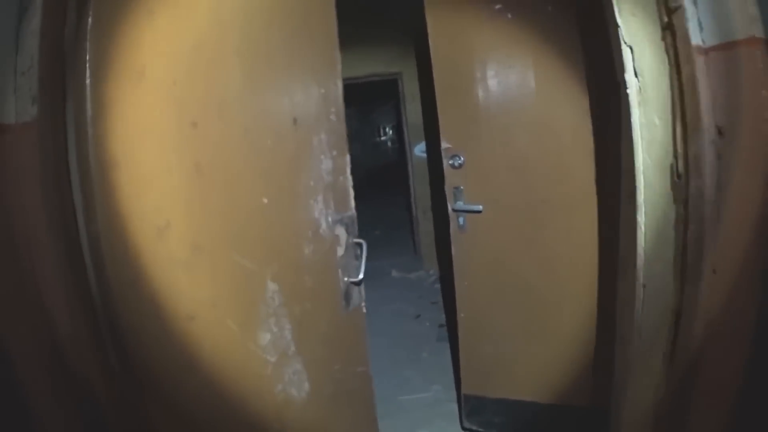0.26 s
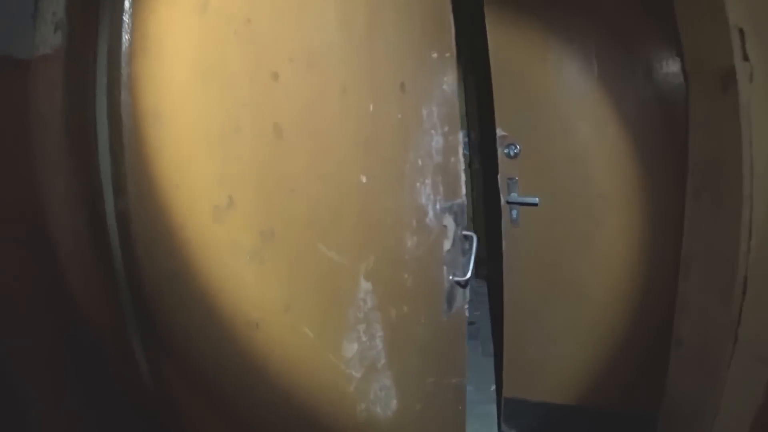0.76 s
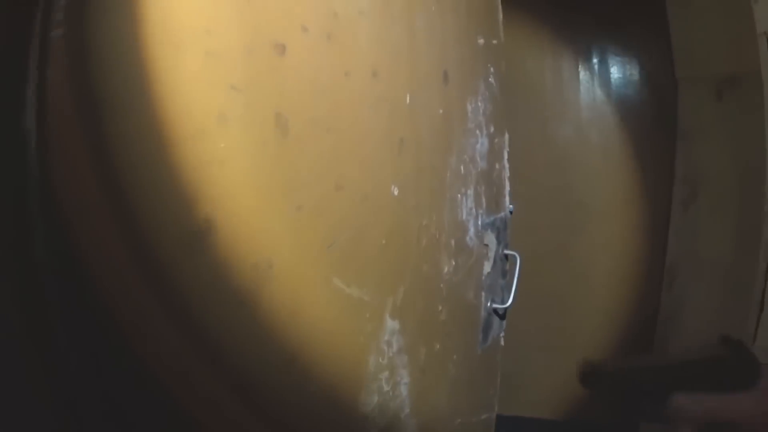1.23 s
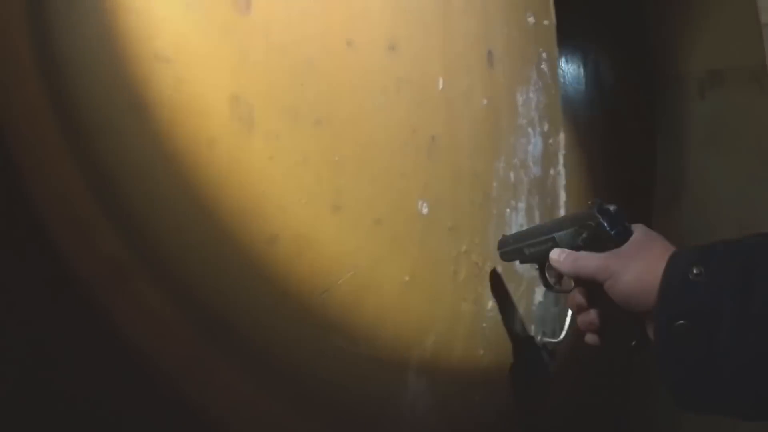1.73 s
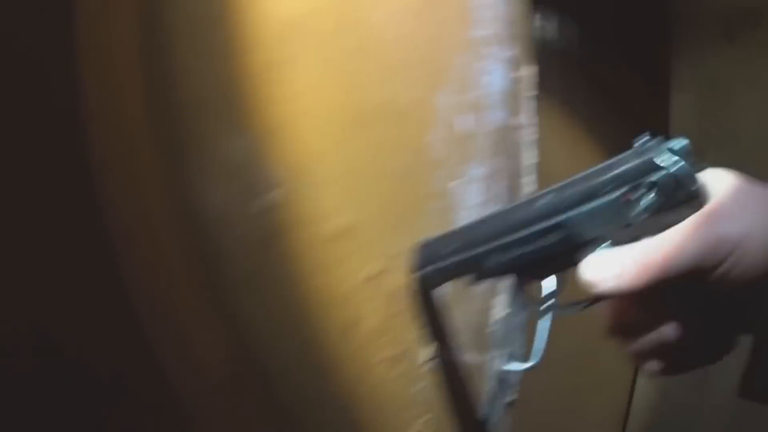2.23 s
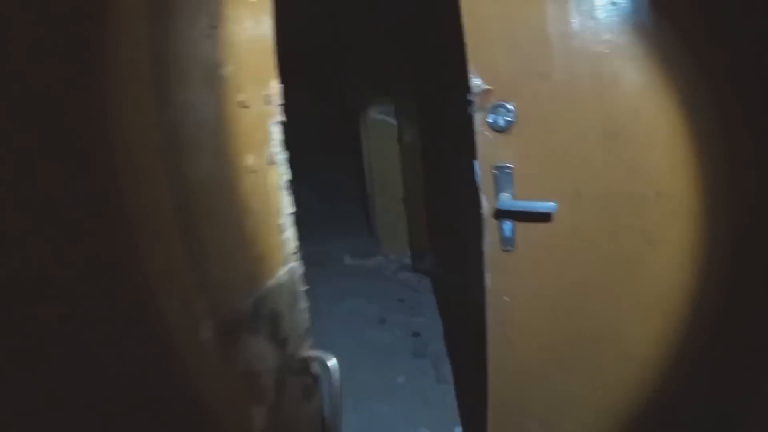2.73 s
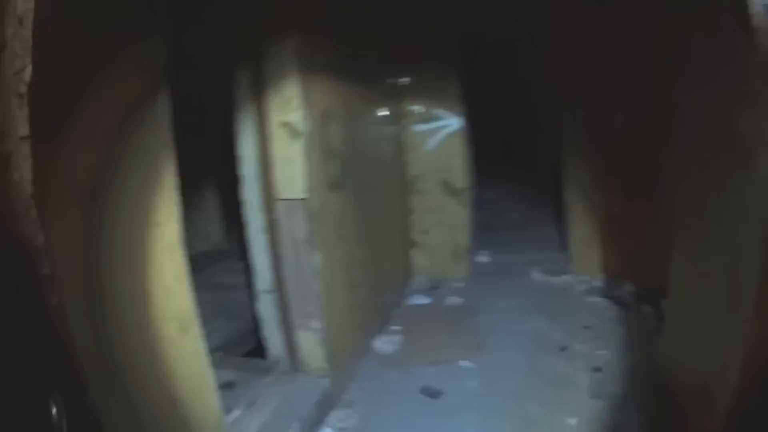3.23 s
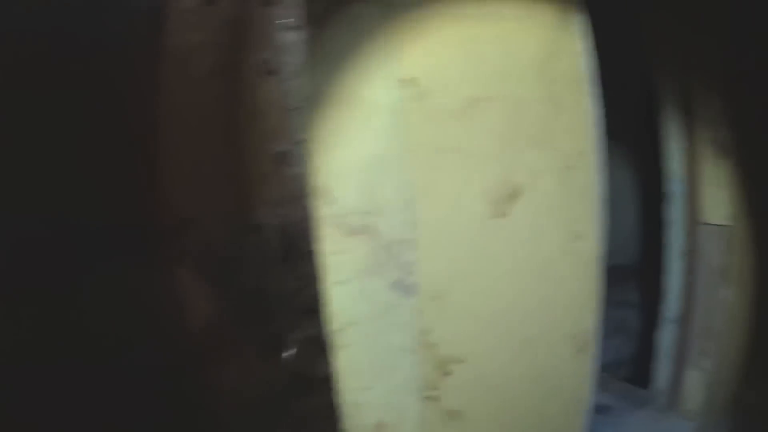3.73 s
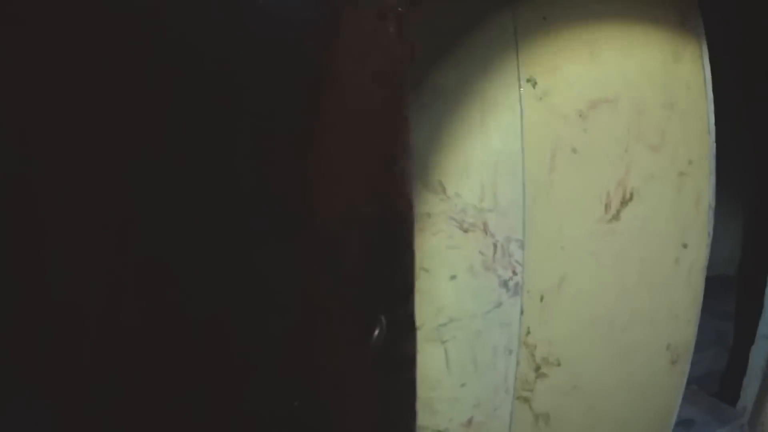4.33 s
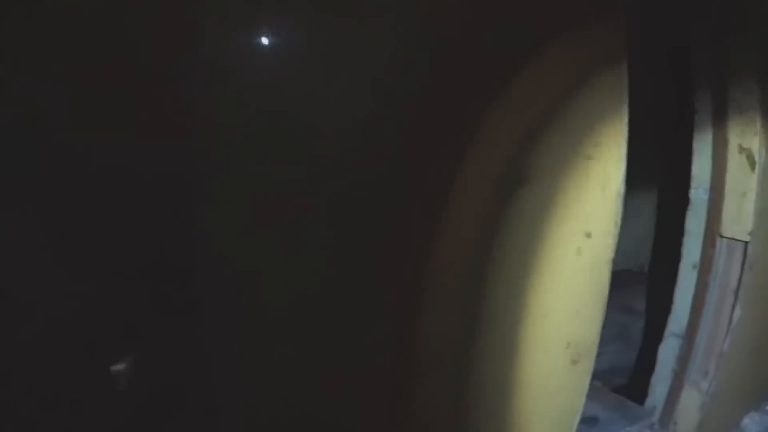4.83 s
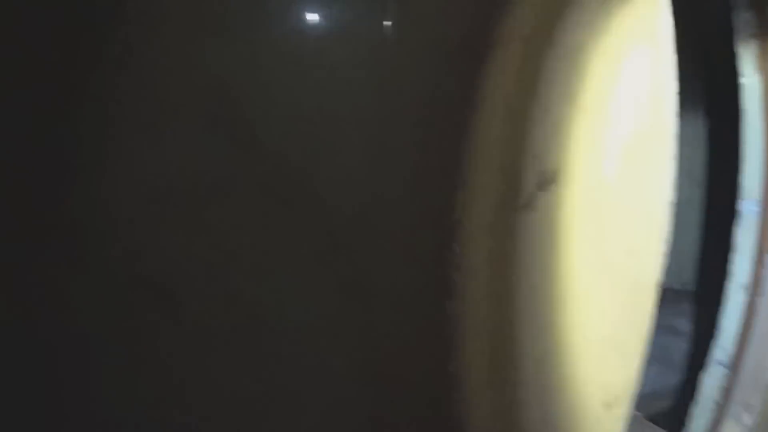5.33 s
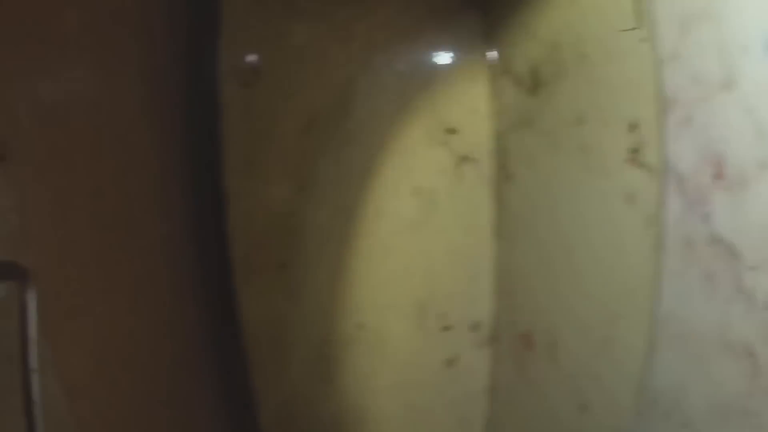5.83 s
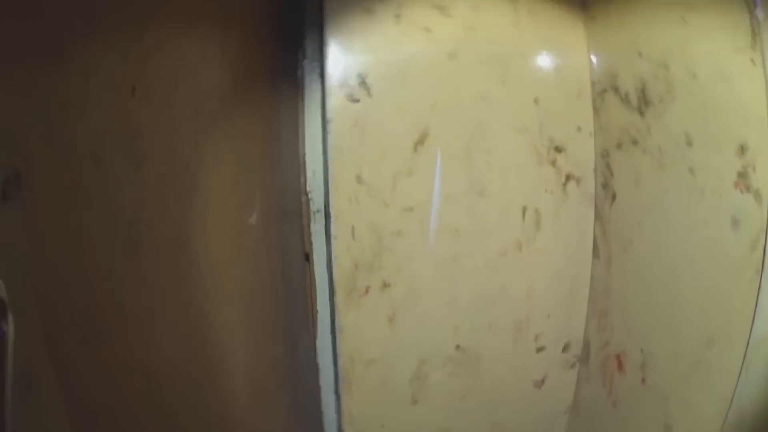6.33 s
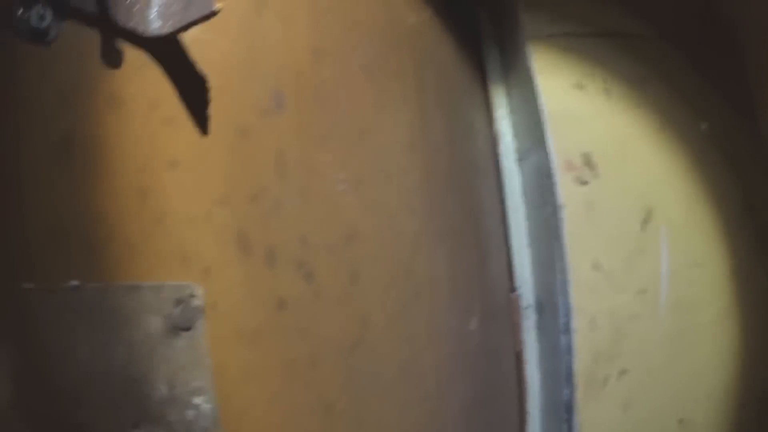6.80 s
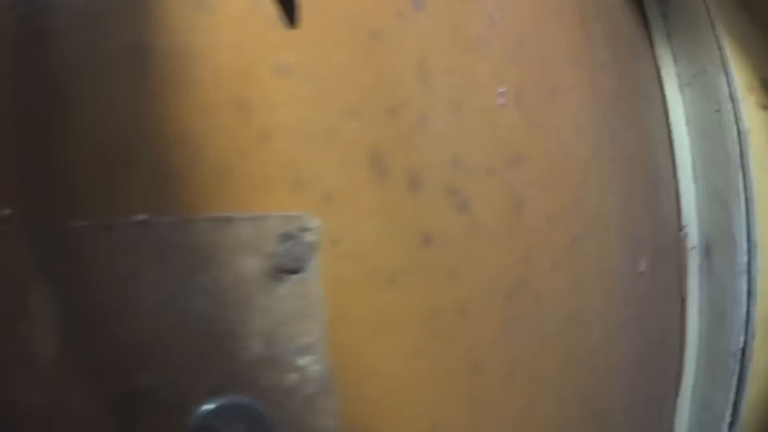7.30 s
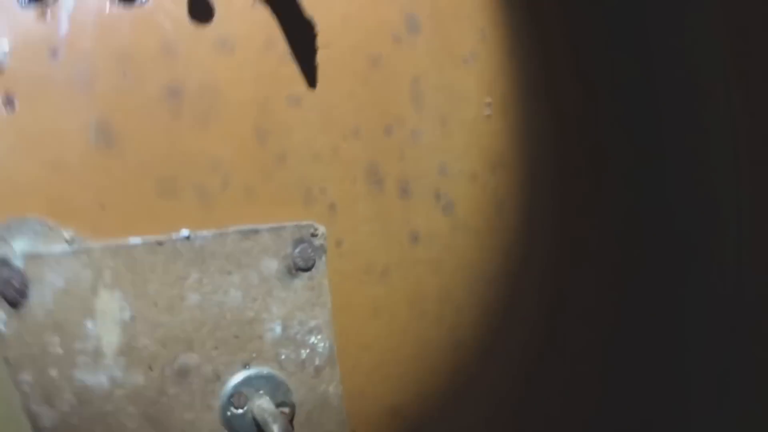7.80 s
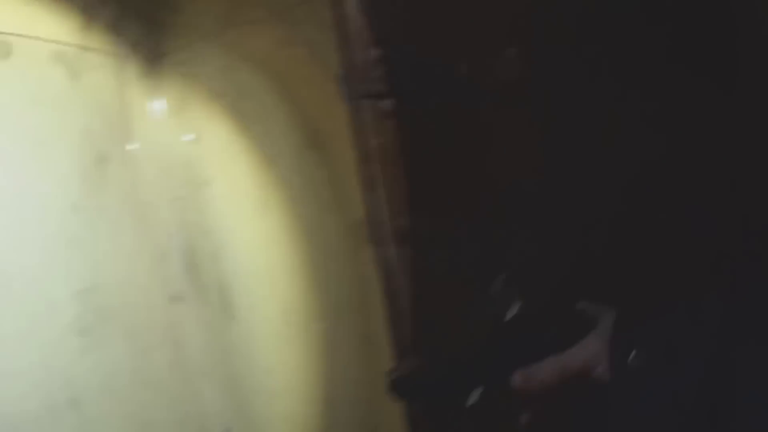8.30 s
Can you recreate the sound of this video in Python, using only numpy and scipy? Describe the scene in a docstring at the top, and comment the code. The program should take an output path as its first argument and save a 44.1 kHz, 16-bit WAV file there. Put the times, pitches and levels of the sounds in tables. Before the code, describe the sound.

Heavy metal-clad doors are knocked, slammed once with a huge ringing boom, then rattled and squeaked in a bare echoing corridor over steady hiss.

```python
"""Soft shuffling and a first light knock come out of steady hiss; then someone works heavy sheet-clad doors
in a bare corridor: one slam, many knocks, latch clatter and a squeaking handle. Ringing modes and rattling
noise make the blows, uneven sine tones the squeaks, damped low swings the thumps, filtered noise the shoes
on grit and the rubbed cloth. Hard walls add echoes, and the input clips the loudest peaks."""
import sys
import numpy as np
from scipy import signal
from scipy.fft import rfft, irfft
from scipy.io import wavfile
from scipy.ndimage import uniform_filter1d

SR = 44100
rng = np.random.default_rng(int(sys.argv[2]) if len(sys.argv) > 2 else 0)


def unload_wav(signal):
    """Save mono or channel-first audio to the path in sys.argv[1] as 16-bit WAV at rate SR, clipped to [-1, 1]."""
    wavfile.write(
        sys.argv[1],
        SR,
        np.round(np.clip(np.atleast_2d(signal).T, -1, 1) * 32767).astype(np.int16),
    )


def undo_db(level):
    """Turn decibels back into plain size, where 20 dB means ten times bigger."""
    steps = np.asarray(level, float) / 20
    return 10 ** steps


N = 377329

# ways the door leaf can ring: pitch_hz, level_db, ring_share (1 = the whole ring time of the blow)
DOOR_MODES = [(146, -4, 1.2), (177, -3, 1.2), (203, 0, 1.1), (232, -4, 1.1), (265, 0, 1.1), (308, 3, 1.1),
              (345, 1, 1.1), (415, -8, .8), (464, 0, .9), (497, -1, .8), (530, -3, .8), (582, 1, .7),
              (643, 0, .7), (735, -3, .7), (781, -4, .7), (860, -5, .7), (961, -1, .6), (1070, 0, .6),
              (1195, 1, .6), (1320, 0, .5), (1430, -2, .45), (1550, -4, .4), (1680, -6, .35),
              (1850, -8, .3)]


def band(x, lo_hz, hi_hz, order=2):
    """Keep only the sound between two frequencies, without looking ahead in time."""
    return signal.sosfilt(signal.butter(order, [lo_hz, hi_hz], "bandpass", fs=SR, output="sos"), x)


def unit(x):
    """Scale to an rms of 1."""
    return x / np.sqrt(np.mean(x ** 2))


def walk(rate_hz):
    """Random values, each held for 1 / rate_hz seconds, then smoothed twice into a wandering curve."""
    k = int(SR / rate_hz)
    steps = np.repeat(rng.standard_normal(N // k + 1), k)
    return 1.49 * uniform_filter1d(uniform_filter1d(steps, k), k)[:N]


def wide(side_db):
    """Stereo noise; side_db sets its left-right difference against its common part."""
    mid, side = rng.standard_normal((2, N))
    return mid + undo_db(side_db) * side * np.array([[1], [-1]])


def hiss():
    """Still air and preamplifier noise: random noise shaped by frequency, widest in the middle of the range."""
    # tone colour of the hiss: pitch_hz, relative_level_db
    colour = [(15, -42.5), (25, 11.5), (54, 3.5), (110, 2.5), (350, 7), (600, -3.5), (1400, -0.5),
              (3080, -4.5), (6000, -6), (11000, -16), (14000, -20.5)]
    # stereo width of the hiss: pitch_hz, side_over_mid_db
    width = [(60, -18.5), (110, 1), (190, 2.5), (350, 3), (620, 14.5), (1110, 7.5), (2000, 3), (3580, -0.5),
             (6420, -6.5), (11500, -3.5)]
    level_db = -55.5  # rms of the common part
    log_hz = np.log(np.maximum(np.fft.rfftfreq(N, 1 / SR), 1))
    colour_hz, colour_db = np.transpose(colour)
    width_hz, width_db = np.transpose(width)
    mid_db = np.interp(log_hz, np.log(colour_hz), colour_db)
    side_db = np.interp(log_hz, np.log(width_hz), width_db)
    mid, side = rfft(rng.standard_normal((2, N))) * undo_db(mid_db)
    mid, side = irfft(mid, N), irfft(side * undo_db(side_db), N)
    return undo_db(level_db) * (mid + side * np.array([[1], [-1]])) / mid.std()


def rustle():
    """Jacket cloth rubbing close by: short narrow bands of flickering noise."""
    # cloth brushes: start_s, length_s, centre_hz, level_db (before each swells and fades)
    brushes = [(5.08, 0.024, 5840, -51.5), (5.316, 0.11, 4890, -54.5), (6.493, 0.048, 5480, -53),
               (6.673, 0.27, 5370, -54), (6.911, 0.041, 5460, -47.5), (6.994, 0.2, 4570, -53),
               (7.973, 0.084, 5700, -46.5), (8.287, 0.16, 5350, -53.5), (8.449, 0.033, 5730, -40)]
    out = np.zeros((2, N))
    noise = wide(-8.0) * undo_db(1.1 * walk(450))
    for start_s, length_s, centre_hz, level_db in brushes:
        i, n = int(start_s * SR), int(length_s * SR)
        brush = unit(band(noise[:, i:i + n], centre_hz / 1.23, centre_hz * 1.2))
        out[:, i:i + n] += undo_db(level_db) * brush * np.sqrt(np.hanning(n))
    return out


def scuffs():
    """A dull tread through the floor and gritty grains under the soles; each scuff swells, holds and dies away."""
    # feet and clothes: start_s, length_s (until it dies away), tread_db, grit_db (before the flutter)
    scuff_events = [(0.577, 0.087, -50.5, -50.5), (0.78, 0.19, -55.5, -55), (1.427, 0.1, -41.5, -61.5),
                    (1.799, 0.2, -56, -47), (2.01, 0.15, -42, -45), (2.513, 0.065, -51, -47.5),
                    (2.968, 0.15, -42, -48.5), (3.652, 0.14, -49, -53), (4.678, 0.14, -55.5, -60),
                    (5.413, 0.31, -46, -43.5), (5.881, 0.062, -50.5, -56), (6.664, 0.13, -49.5, -53),
                    (7.52, 0.063, -49, -50.5), (7.553, 0.018, -41, -47), (7.695, 0.16, -42.5, -45),
                    (7.97, 0.2, -51, -48), (8.18, 0.17, -45, -56.5)]
    # shuffling between the scuffs: time_s, tread_db, grit_db (before the flutter)
    shuffle = [(0, -56.5, -55.5), (.5, -56.5, -62), (1.15, -54, -59), (2.4, -53.5, -54),
               (3.4, -52.5, -58.5), (4.202, -62.5, -78.5), (4.5, -54.5, -66.5), (5.2, -57, -115),
               (6.3, -58.5, -64.5), (7.2, -54, -60), (8.56, -50.5, -52.5)]
    attack_s, release_s = 0.03, 0.12
    t = np.arange(N) / SR
    time_s, tread_db, grit_db = np.transpose(shuffle)
    tread = undo_db(np.interp(t, time_s, tread_db))
    grit = undo_db(np.interp(t, time_s, grit_db))
    for start_s, length_s, tread_db, grit_db in scuff_events:
        swell = np.clip((t - start_s) / attack_s, 0, 1)
        shape = swell * np.exp(-np.maximum(t - start_s - length_s, 0) / release_s)
        tread = np.hypot(tread, undo_db(tread_db) * shape)
        grit = np.hypot(grit, undo_db(grit_db) * shape)
    # both levels flutter at random
    tread = tread * undo_db(2.5 * walk(40))
    grit = grit * undo_db(1.5 * walk(50))
    # about one sample in ten carries a grain
    grains = undo_db(.8 * rng.exponential(size=N)) * (rng.random(N) < .1)
    dull = unit(band(wide(-8.5), 88, 1010)) + undo_db(-13) * unit(band(wide(-15.5), 22, 130))
    gritty = unit(band(wide(-9.5) * grains, 1000, 3020, order=1))
    return tread * dull + grit * gritty


def thumps():
    """Heels and door edges land softly: a low swing with a neighbour above and below, quickly damped."""
    # thumps through the floor: start_s, level_db (of the main swing, before damping), pitch_hz,
    # fade_s (time to fall 60 dB)
    thump_events = [(0.594, -43.5, 136.5, 0.25), (0.719, -53, 150, 0.1), (1.369, -39.5, 132, 0.19),
                    (1.638, -49, 96.9, 0.1), (2.975, -26, 198, 0.084), (3.131, -29.5, 111, 0.072),
                    (3.32, -26, 144, 0.11), (3.869, -41, 52, 0.11), (4.028, -49, 51.3, 0.13),
                    (4.354, -43, 137.5, 0.15), (5.071, -48, 74.3, 0.095), (5.414, -31.5, 103.3, 0.1),
                    (6.049, -47, 94.6, 0.1), (6.34, -43.5, 146.3, 0.071), (6.573, -37, 124, 0.1),
                    (6.711, -36, 102, 0.1), (6.749, -45, 61.9, 0.1), (6.828, -40, 86.1, 0.1),
                    (6.908, -43, 81, 0.13), (7.398, -33.5, 186, 0.11), (8.109, -25, 198.6, 0.14)]
    attack_s = 0.0018
    out = np.zeros(N + SR)
    t = np.arange(SR // 2) / SR
    phases = rng.uniform(0, 2 * np.pi, (len(thump_events), 2))
    for (start_s, level_db, pitch_hz, fade_s), phase in zip(thump_events, phases):
        turn = 2 * np.pi * pitch_hz * t
        swing = np.sin(turn) + 0.68 * np.sin(2.7 * turn + phase[0]) + 0.79 * np.sin(.6 * turn + phase[1])
        shape = (1 - np.exp(-t / attack_s)) * np.exp(-np.log(1000) * t / fade_s)
        out[int(start_s * SR):][:len(t)] += undo_db(level_db) * swing * shape
    return out[:N]


def squeak():
    """Surfaces stick and slip: tones that are thin when the slips are even and rough when they are not."""
    # long squeak of the handle: time_s, slip_hz, level_db (before the stutter), roughness (0-1)
    handle = [(7.67, 1019, -31.5, .05), (7.746, 1089, -40, 0.05), (7.785, 1235, -26, 0.08),
              (7.809, 1256, -35.5, .07), (7.824, 1091, -38, 0.12), (7.851, 1153, -35.5, 0.14),
              (7.885, 1240, -32.5, 0.1), (7.919, 1360, -40, 0.04), (7.94, 1420, -52, 0.2)]
    # short creaks of hinge and handle: start_s, length_s, first_slip_hz, last_slip_hz, level_db (peak, before
    # the stutter)
    creaks = [(4.569, 0.089, 326, 225, -51), (4.729, 0.056, 1126, 1144, -45.5),
              (4.771, 0.15, 272, 224, -52), (8.306, 0.063, 800, 794, -35)]
    creak_rough = 0.088  # 0-1
    t, out = np.arange(N) / SR, np.zeros(N)
    uneven = walk(1200)
    stutter_db = 3.5 * walk(250)

    def slip(on, slip_hz, level_db, rough):
        """Slips at an uneven rate, heard as a tone with a faint octave."""
        phase = np.cumsum(2 * np.pi * slip_hz * (1 + rough * uneven[on])) / SR
        return undo_db(level_db + stutter_db[on]) * (np.sin(phase) + .07 * np.sin(2 * phase))

    time_s, *columns = np.transpose(handle)
    on = slice(int(time_s[0] * SR), int(time_s[-1] * SR))
    curves = [np.interp(t[on], time_s, column) for column in columns]
    out[on] = signal.windows.tukey(len(t[on]), .2) * slip(on, *curves)
    for start_s, length_s, first_hz, last_hz, level_db in creaks:
        i, n = int(start_s * SR), int(length_s * SR)
        on = slice(i, i + n)
        out[on] += np.hanning(n) * slip(on, np.linspace(first_hz, last_hz, n), level_db, creak_rough)
    return out


def blow(body_db, panel_db, plate_db, crack_db, tick_db, ring_s, chance, noise):
    """One contact: every mode starts with its own strength; loose cladding rattles between and above the modes."""
    hz, db, share = np.transpose(DOOR_MODES)[:, :, None]
    pitch_luck, strength_luck, phase_luck, beat_luck = chance
    t = np.arange(int(min(1.0 * ring_s + .08, 1.2) * SR)) / SR
    fade = np.log(1000) * t / ring_s
    hz = hz * (1 + .01 * pitch_luck)
    # each mode is a close pair, so it beats; the place of contact sets which modes speak
    beat = np.cos(2 * np.pi * .015 * hz * beat_luck * t + .5 * phase_luck)
    # neighbouring body modes swing against each other; the higher ones start together: a sharp front
    swing = np.where(hz < 400, (-1) ** np.arange(len(DOOR_MODES))[:, None], 1)
    # modes lean towards the louder neighbouring range
    lean_db = np.interp(np.log(hz), np.log([230, 600, 1300, 2800]), [body_db, panel_db, plate_db, crack_db])
    strength = swing * undo_db(db + .6 * lean_db + 1.5 * strength_luck)
    modes = strength * np.sin(2 * np.pi * hz * t + .5 * phase_luck) * beat * np.exp(-fade / share)
    # the contact itself, before the leaf rings freely
    snap = 1 + 1.2 * np.exp(-t / .003) + 3.75 * np.exp(-t / 0.02)
    first = int(.015 * SR)  # levels are set over the first 15 ms
    out = np.zeros(len(t))
    # low edge Hz, high edge Hz, level dB, how fast the rattle dies
    ranges = ((148, 389, body_db, 0.65), (404.4, 896, panel_db, 0.82), (972, 1950, plate_db, 1.59))
    for lo, hi, band_db, quick in ranges:
        tone = modes[(hz[:, 0] >= lo) & (hz[:, 0] < hi)].sum(axis=0)
        rattle = band(noise[:len(t)] * np.exp(-quick * fade), lo, hi)
        part = tone / tone[:2 * first].std() + .85 * rattle / rattle[:2 * first].std()
        part = band(snap * part, .95 * lo, 1.05 * hi, order=3)
        out += undo_db(band_db) * part / part[:first].std()
    # metal on metal: a spiky crack, then a short buzz
    spikes = noise[-len(t):] * abs(noise[1:len(t) + 1])
    spikes = spikes * (np.exp(-t / 0.0013) + .5 * np.exp(-t / np.minimum(0.092 * ring_s, .025)))
    for lo, hi, band_db in ((1630, 4300, crack_db), (4170, 9060, tick_db)):
        part = band(spikes, lo, hi, order=3)
        out += undo_db(band_db) * part / part[:first].std()
    # the frame and floor shudder below the leaf's modes
    shudder = unit(band(noise[:len(t)], 22, 47)) * np.exp(-.45 * fade)
    shudder = shudder * np.minimum(t / 0.0086, 1) * np.hanning(2 * len(t))[len(t):]
    return out + undo_db(body_db - 28) * shudder


def door():
    """All blows, each a little to one side; thud of leaf and clack of hardware share five pitch ranges."""
    # blows: start_s, thud_db, thud_centre_octaves (above 230 Hz), clack_db, clack_centre_octaves (above 230 Hz);
    # levels are rms over the first 15 ms at the centre, before the soft start
    blows = [(0.0738, -39, 2.3, -37.5, 3.64), (0.417, -70, 4, -45, 2.8), (0.466, -45.5, 2.5, -48.5, 2.7),
             (0.605, -47.5, 0.1, -41.5, 3.6), (0.716, -67, 1, -42.5, 2.3), (0.84, -64, 6, -43, 2.8),
             (1.369, -47, -7, -53, 4.54), (1.4151, -16, 1.78, -19.5, 3.22), (1.8, -39, 0.8, -38, 3.77),
             (1.9164, -1, 1.1, -23, 3.44), (2.247, -22.5, 0.4, -55, 2), (2.312, -23, 2.55, -28.5, 3.76),
             (2.576, -42, 2.7, -43.6, 2.6), (2.976, -37.5, 1, -46, 3.2), (3.009, -54.4, 0, -44, 3.2),
             (3.12, -33.5, 1.15, -40, 3.37), (3.316, -22.5, 1.28, -32.5, 1.92),
             (3.578, -42.5, 0.9, -40, 3.16), (3.601, -26.5, 3, -37.5, 5.1), (3.74, -44.5, 1.7, -45, 2.8),
             (4.006, -42, 0.9, -54, 1.6), (4.348, -43.5, 1.8, -46.5, 2.0), (4.371, -59.5, 0.48, -47.5, 3.9),
             (4.521, -51, 2.5, -46, 3.89), (5.083, -47, 0.9, -48.5, 5), (5.4102, -26.5, 0.96, -45, 2.85),
             (5.463, -32, 1.6, -34, 4.05), (5.472, -48.5, -8, -22.5, 3.42), (5.4798, -28, 2.5, -25, 4.17),
             (5.583, -33.5, 2.29, -24.5, 3.76), (5.595, -34, 2, -33, 3.8), (5.638, -32.5, 2.64, -36.5, 4),
             (5.93, -39.5, 1.7, -41.5, 1.5), (6.578, -15, 2, -37.5, 3.87), (6.618, -37, 2.7, -60, 4.49),
             (6.716, -33.5, 1.1, -54, 3.9), (6.821, -36, 0.7, -69, 5.2), (7.0045, -19, 1.22, -30, 2.58),
             (7.394, -37, 2, -39, 4.2), (7.69, -26.5, 1.22, -34.5, 3.5), (7.714, -32.5, 1.9, -51, 3.35),
             (8.096, -14, 1.46, -14, 3.05), (8.32, -42, 2.5, -61, 3.9), (8.54, -38.5, 2.1, -37, 2.64)]
    low_hz = 230
    ranges_hz = np.array([230, 600, 1300, 2800, 5800])  # body, panel, plate, crack, tick
    # loss one octave off the centre, growing with the square of the distance
    thud_fall_below_db, thud_fall_above_db, clack_fall_db = 6.5, 16, 9.5
    slam_db = -8  # a thud above this sets the whole leaf ringing
    knock_ring_s, slam_ring_s = .16, 1
    soft_db = -37  # blows no louder than this start softly
    contact_s, soft_contact_s = .0003, .003  # rise times
    out = np.zeros((2, N + 2 * SR))
    chances = rng.standard_normal((len(blows), 4, len(DOOR_MODES), 1))
    noise = rng.standard_normal(N + 2 * SR)
    octaves = np.log2(ranges_hz / low_hz)
    for (start_s, thud_db, thud_oct, clack_db, clack_oct), chance in zip(blows, chances):
        thud_fall_db = np.where(octaves < thud_oct, thud_fall_below_db, thud_fall_above_db)
        thud = undo_db(thud_db - thud_fall_db * (octaves - thud_oct) ** 2)
        clack = undo_db(clack_db - clack_fall_db * (octaves - clack_oct) ** 2)
        levels_db = 20 * np.log10(np.hypot(thud, clack))
        ring_s = slam_ring_s if thud_db > slam_db else knock_ring_s
        i = int(start_s * SR)
        y = blow(*levels_db, ring_s, chance, noise[i:i + 2 * SR])
        rise_s = contact_s if max(thud_db, clack_db) > soft_db else soft_contact_s
        y = y * (1 - np.exp(-np.arange(len(y)) / SR / rise_s))
        out[:, i:i + len(y)] += y * undo_db(.6 * chance[0, 0] * np.array([[1], [-1]]))
    return out[:, :N]


def corridor(x):
    """Dense echoes off hard walls; each band dies at its own rate, less alike left and right in the treble."""
    # echo bands: centre_hz, fade_s (time to fall 60 dB), echo_energy_over_direct_db, side_over_mid_db
    echo_bands = [(75, 4.3, -9, -38), (150, 0.43, -3.5, -32.5), (300, 0.71, -6, -19.5),
                  (800, 0.29, -9.5, -2.5), (1747, 0.37, -8.5, -3.5), (4090, 0.38, -11.5, -8.5),
                  (8880, 0.23, -9, 12)]
    t = np.arange(int(1.5 * SR)) / SR
    echo = 0
    for centre_hz, fade_s, level_db, side_db in echo_bands:
        tail = band(wide(side_db)[:, :len(t)], centre_hz / 1.75, centre_hz * 1.38)
        tail = tail * np.exp(-np.log(1000) * t / fade_s) * (1 - np.exp(-t / 0.0009))
        # wider bands need more energy for the same echo level
        echo = echo + undo_db(level_db) * unit(tail) * np.sqrt(5 / 3 * centre_hz / SR / len(t))
    return signal.fftconvolve(x.mean(axis=0)[None], echo, axes=1)[:, :N]


def scene():
    """Hiss and cloth without echo; shoes, thumps, squeaks and doors with the corridor's echoes."""
    background = hiss() + rustle()
    near = scuffs() + thumps() + squeak() + door()
    return background + near + corridor(near)


def roll_off(x):
    """The treble ends steeply here."""
    return signal.sosfilt(signal.butter(12, 12120, fs=SR, output="sos"), x)


def record(dry):
    """The input clips flat just below full scale; above a steep edge at 11 kHz little of the top is left."""
    clipped = np.clip(dry, -.98, .98)
    low_pass = signal.ellip(6, .1, 14, 11000, fs=SR, output="sos")
    mix = signal.sosfiltfilt(low_pass, clipped)
    return roll_off(mix)


dry = scene()
out = record(dry)
unload_wav(out)
```